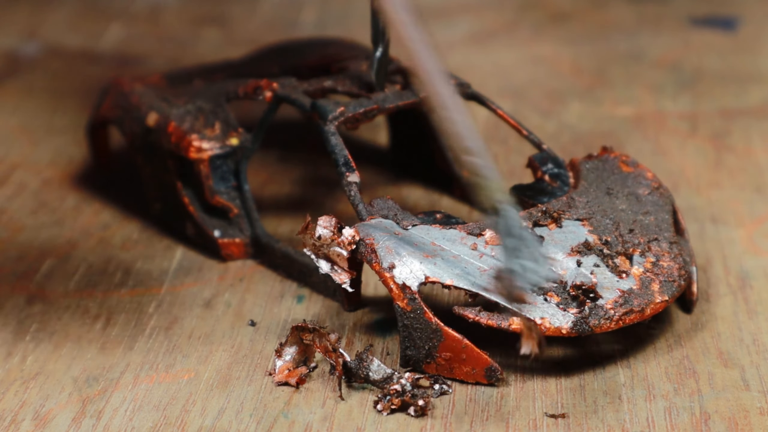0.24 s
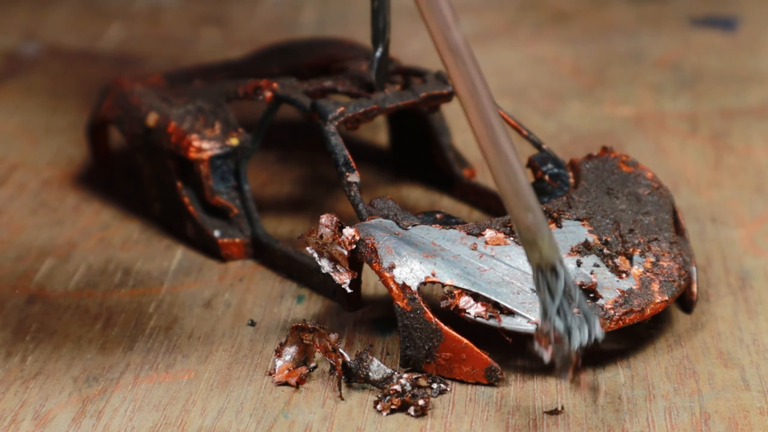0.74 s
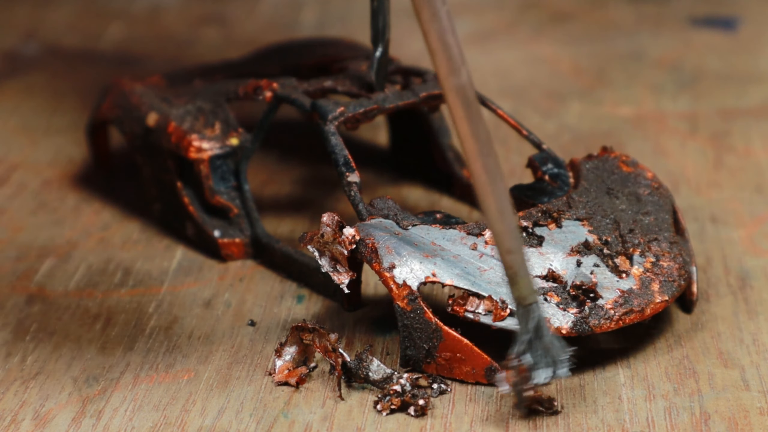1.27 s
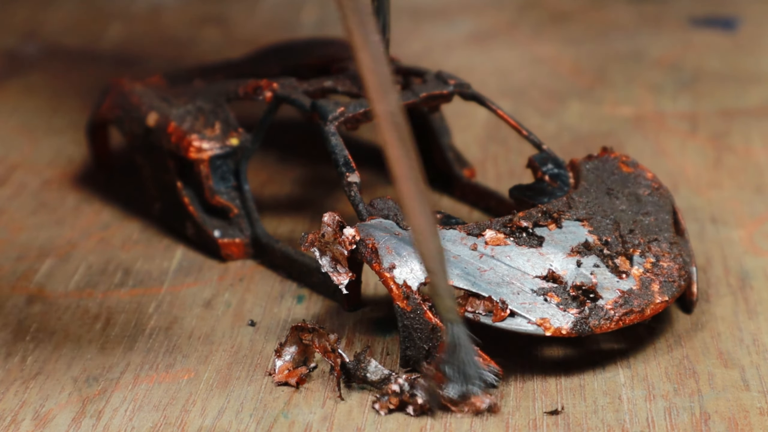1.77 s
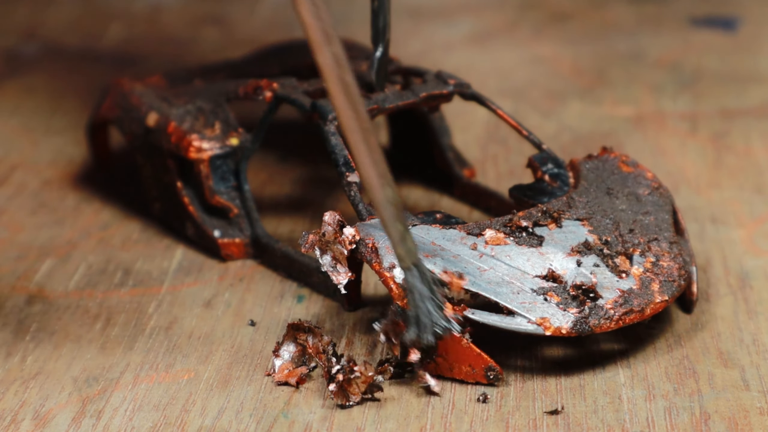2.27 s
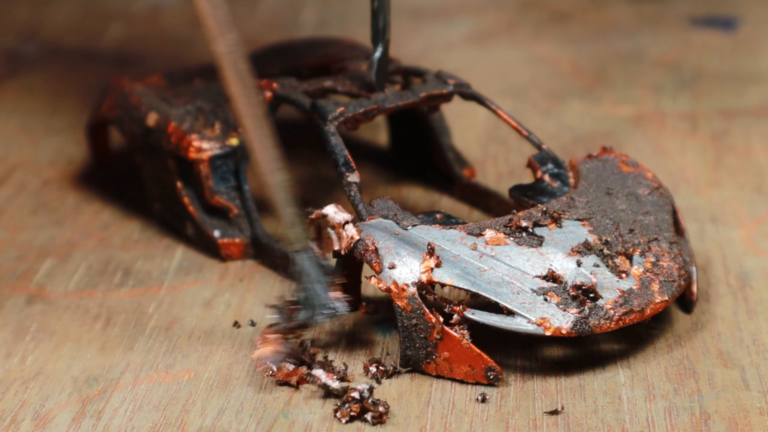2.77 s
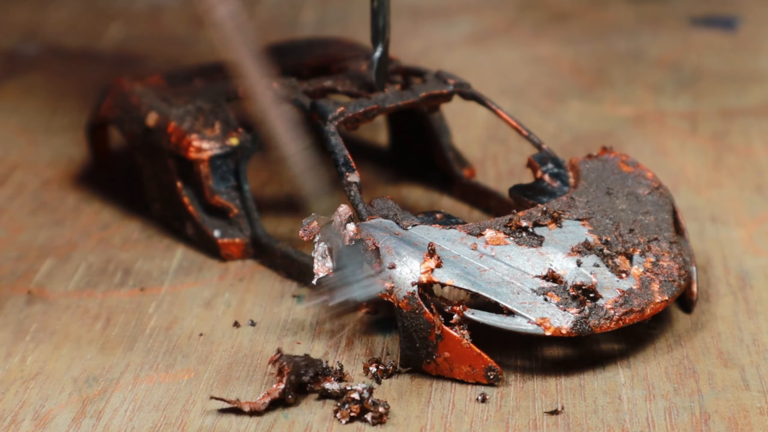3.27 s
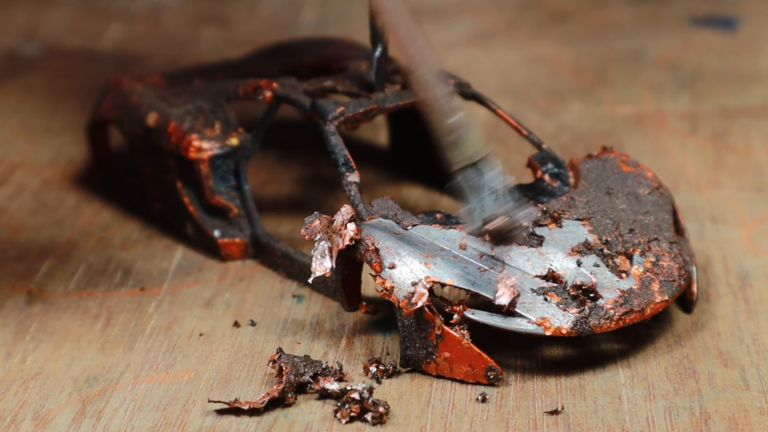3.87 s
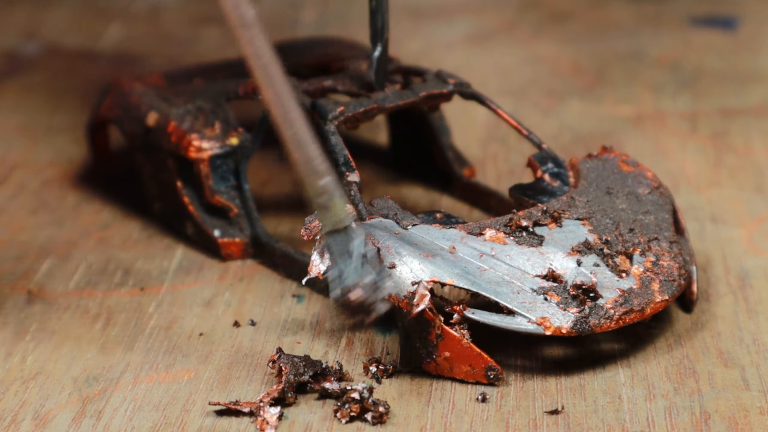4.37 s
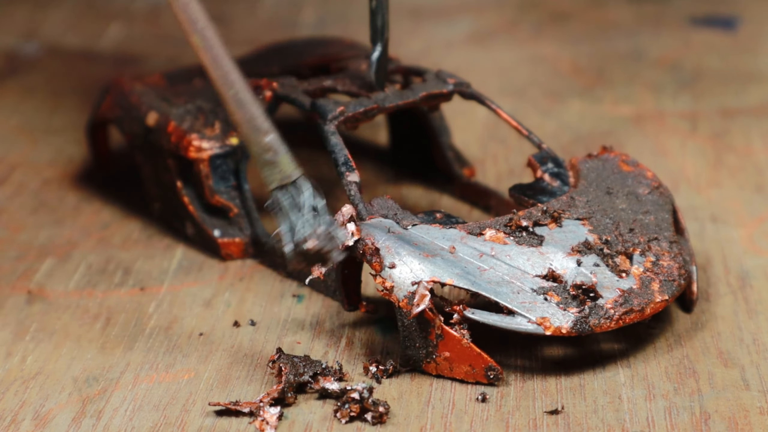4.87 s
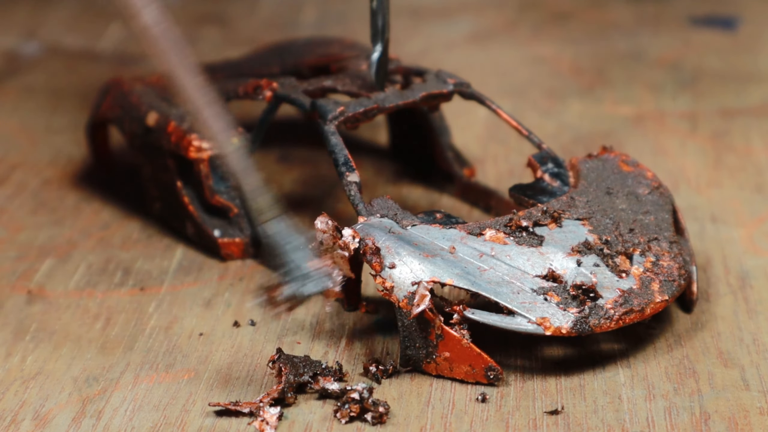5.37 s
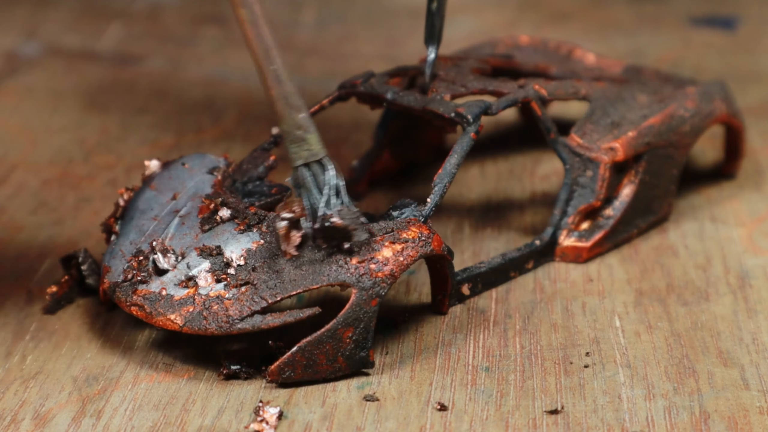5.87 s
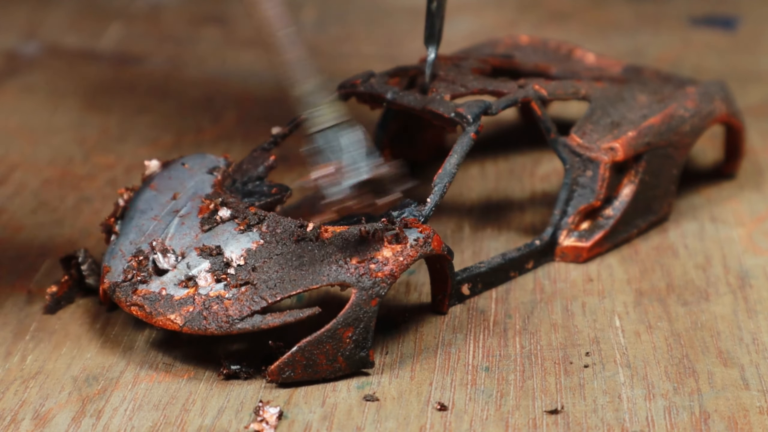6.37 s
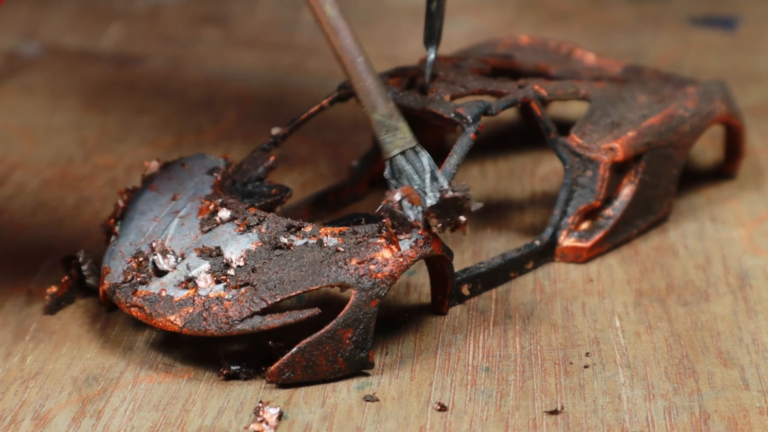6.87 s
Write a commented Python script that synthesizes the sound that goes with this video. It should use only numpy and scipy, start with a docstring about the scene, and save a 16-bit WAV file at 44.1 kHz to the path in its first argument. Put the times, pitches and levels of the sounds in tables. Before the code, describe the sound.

Close and nearly mono: bristles scratch a thin metal shell in separate strokes, first on the bonnet, then the door with crisp snaps and small knocks, bonnet again, then briefly the door. A momentary dropout at about 5.9 seconds leads to lighter, regular scrubs on the far wing, with wider stereo and a little more room. Low bench rumble and soft air noise lie beneath.

```python
"""A stiff little brush scrubs loosened paint off a die-cast toy car body pinned to a wooden bench: its bristles
stick and slip in dense grains, noise pulses that excite resonators for the modes of shell and bench.
Strokes land with soft low knocks, tufts snap over edges in bright noise bursts with pings, and paint crumbs tick.
After catches a decaying sine rings on; a rumble, a short room tail and faint air noise lie beneath.
The brush works on bonnet, door, bonnet and door; after a brief silence, on the far wing with a wider sound."""
import sys
import numpy as np
from scipy import signal
from scipy.fft import rfft, irfft
from scipy.io import wavfile

SR = 44100
rng = np.random.default_rng(int(sys.argv[2]) if len(sys.argv) > 2 else 0)


def materialize(psi):
    """Save the field psi as 16-bit PCM at rate SR to the path in sys.argv[1].

    A 1-D psi becomes a single channel; in a 2-D psi each row is a channel.
    """
    bounded = np.clip(np.atleast_2d(psi).T, -1, 1)
    quanta = np.round(bounded * 32767).astype(np.int16)
    wavfile.write(sys.argv[1], SR, quanta)


N = 314874
TIME = np.arange(N) / SR   # s

# All table levels are relative.
# spectrum of the room noise: f/Hz, density/dB
AIR_SPECTRUM = [(25, -9.5), (70, -1.5), (250, -6.5), (400, -10.5), (1000, -17.5), (3000, -22),
                (12000, -25.5), (16000, -20.5)]
# shudder of the bench as the hand bears down: t/s, level/dB, time to fall 30 dB/s
SHUDDERS = [(3.66, -50, 0.7), (6.63, -48.5, 0.34)]
# crumbs of paint breaking off: t/s, peak level/dB
CRUMB_TICKS = [(1.132, -45), (3.348, -52), (3.359, -48.5), (3.432, -51.5), (3.832, -55.5), (4.207, -49.5),
               (4.269, -49), (6.097, -54.5)]
# spectrum of a crumb's tick: f/Hz, density/dB
CRUMB_SPECTRUM = [(300, 3), (1000, 0), (2200, 2.5), (4500, -3.5), (10000, -3), (15000, -7)]
# resonances of shell and bench: f/Hz, width/Hz, level on the door/dB, on the bonnet/dB, on the far wing/dB
SHELL_MODES = [(133, 66, -11.5, -6.5, -5.5), (204.4, 28.5, -6.5, -7, -11.5), (256.2, 9.6, -15, -8, -11.5),
               (327.5, 13.5, -17.5, -35, -16.5), (381, 26, -14.5, -18.5, -19.5),
               (518.5, 24.5, -11, -10.5, -20.5), (667, 37, -20.5, -22.5, -17),
               (818, 26.6, -11.5, -11.5, -12), (945, 74, -28, -15, -12.5), (1194, 40, -8, -16.5, -36),
               (1254, 64, -11.5, -20.5, -10), (1301, 27, -15, -10.5, -36), (1430, 88, -37, -12.5, -4.5),
               (1571, 70, -17, -11, -15.5), (1640, 72, -16.5, -9, -35), (2110, 91, -20.5, -52, -43),
               (2282, 73, -23, -23, -10), (2426, 100, -14, -17, -7.5), (2820, 82, -15, -18, -14.5),
               (3174, 320, -18, -16, -5), (3795, 260, -17, -15, -9.5), (4520, 410, -11.5, -15, -18),
               (5815, 280, -10, -28, -12.5), (6126, 170, -8, -5, -8), (7900, 120, -41, -38, -24),
               (8060, 940, -13, -19, -37), (9460, 2000, -12.5, -7.5, -8), (10740, 900, -16, -13.5, -11),
               (12650, 3600, -32, -5, -38)]
# landings of the brush: t/s, thud of the bench level/dB, clack of the shell level/dB
LANDINGS = [(.049, -31.5, -53), (.446, -31, -63), (.903, -26.5, -61), (.942, -26.5, -35), (1.256, -41, -36),
            (1.436, -50, -37), (1.861, -31, -25.5), (2.258, -30.5, -47), (2.716, -35.5, -39.5),
            (4.024, -49.5, -54), (4.325, -39.5, -62), (5.185, -37.5, -39)]
# tufts snapping over an edge: t/s, crack level/dB, shell ping level/dB, shell clack level/dB,
# time to fall 30 dB/s
TUFT_SNAPS = [(.047, -40, -54, -46, 0.011), (0.067, -26.5, -66, -28, 0.02),
              (0.442, -46, -48.5, -44.5, 0.02), (0.489, -38, -44.5, -66, 0.022),
              (0.561, -26, -36, -38, .007), (0.703, -37, -52, -60, .006), (0.642, -26.5, -55, -34, 0.02),
              (0.7162, -18.5, -57, -58, 0.0064), (0.898, -34, -37.5, -41.5, 0.018),
              (0.94, -14, -21, -25.5, 0.015), (0.9937, -15, -34, -60, 0.011),
              (1.0108, -17, -37, -26, 0.0087), (1.084, -27, -45, -60, 0.0096),
              (1.095, -24, -46, -65, 0.011), (1.184, -35.5, -65, -59, 0.036),
              (1.2072, -18.5, -33, -38, 0.01), (1.264, -14, -40, -39, 0.013),
              (1.493, -22, -46, -35, 0.0059), (1.701, -21, -69.5, -36.5, 0.011),
              (1.895, -21, -35, -34.5, 0.0063), (1.902, -25, -48, -52, .008),
              (2.2513, -19.5, -35.5, -44, 0.023), (2.3253, -13.5, -35, -27, 0.022),
              (2.461, -26, -45, -45, 0.0084), (2.84, -25, -39, -30, 0.012), (3.2182, -23, -40, -26, 0.0036),
              (3.2852, -33, -45, -47, .012), (3.2928, -30.5, -44, -60, .014),
              (3.679, -21.5, -46, -44, 0.0076), (4.077, -37, -53, -34, 0.011),
              (4.326, -42.5, -53, -55.5, 0.049), (4.361, -40, -34.5, -48, 0.05),
              (4.833, -27, -58, -58, 0.0069), (5.191, -28, -47, -31, .018), (5.299, -21, -46, -43, 0.013),
              (6.353, -44, -44, -44.5, 0.006), (6.777, -56, -47, -34.5, 0.019)]
# spectrum of a snap's crack: f/Hz, density/dB
CRACK_SPECTRUM = [(500, -8.5), (2000, -3.5), (5000, -10), (8000, 4), (11000, 5), (13500, 4), (16000, -2)]
# the brush catches on an edge, loads up and slips off: t/s, time to load by 30 dB/s,
# rasp level/dB, push level/dB, level of the ring left behind/dB
EDGE_CATCHES = [(.071, 0.0059, -31, -32.5, -40.5), (.553, 0.055, -34, -33, -68),
                (0.715, .03, -58, -54, -55), (1.264, 0.034, -37, -30.5, -47.5),
                (1.896, 0.02, -31.5, -34, -57), (1.986, 0.1, -44, -36.5, -46),
                (2.085, 0.055, -42.5, -51, -48.5), (2.328, 0.014, -29, -41, -57),
                (2.381, .06, -47, -31.5, -48), (2.469, 0.049, -30.5, -31.5, -42),
                (2.843, 0.033, -33, -46, -50.5), (3.215, 0.026, -33, -53, -37),
                (5.297, 0.055, -32.5, -37, -67)]
# place of the brush: from t/s, place (0 door, 1 bonnet, 2 far wing)
BRUSH_PLACES = [(0, 1), (.3, 0), (3.5, 1), (5.5, 0), (5.88, 2)]
# fading by 30 dB as the brush lifts, one row per place: rasp time/s, push time/s
LIFT_TIMES = [(0.027, 0.048), (0.019, 0.025), (0.053, 0.043)]
# strokes: t when the bristles are fully down/s, attack/s, hold/s, bristle rasp level/dB,
# push on the shell level/dB, swell over the hold/dB, swish of the tips level/dB,
# rub on the panel edge level/dB, weight on the low modes level/dB
BRUSH_STROKES = [(0.073, .008, 0.084, -46.5, -46, 0, -18, -18, -2),
                 (0.522, .075, 0.17, -46.5, -44, 1, -2, -4.5, -1.5),
                 (0.944, 0.041, 0.14, -49, -46, 2.5, 1.5, -7.5, -5),
                 (1.251, 0.08, 0.036, -54.5, -54, -1, -4, -14, -2.5),
                 (1.416, .012, .02, -49, -57.5, -2.5, 3, -1, -6),
                 (1.487, 0.056, 0.076, -44, -43.5, 2.5, -14, -10, -3.5),
                 (1.583, 0.021, 0.11, -57.5, -50, 4, -9, -16, -3.5),
                 (1.898, .04, 0.19, -50.5, -44.5, 2, -9.5, -22, -3),
                 (2.253, 0.0041, 0.013, -38.5, -42, -4, -9, -20, -3),
                 (2.311, 0.029, 0.15, -45.5, -44.5, -18.5, -9, -22, -4),
                 (2.735, 0.015, 0.087, -43, -41.5, 6.5, -13.5, -25, -3),
                 (3.166, 0.0086, 0.056, -44.5, -43.5, 1.5, -20, -28, -4),
                 (3.372, .06, 0.13, -66, -76, 1, -15, -15, -1),
                 (3.607, 0.036, .097, -42, -45, 2.5, -7, -15, -2),
                 (4.045, 0.038, 0.034, -43, -44.5, -0.5, -2.5, -18, -0.5),
                 (4.369, .012, 0.082, -45.5, -44.5, 2.5, -4, -17, 0),
                 (4.838, 0.053, 0.091, -46.5, -48, 0.5, -6, -15.5, -2),
                 (5.23, .045, 0.053, -41.5, -41.5, 6.5, -16, -17.5, -8.5),
                 (5.448, 0.091, .07, -63, -72.5, -1, -14, -14, 9.5),
                 (5.612, 0.0046, 0.019, -41.5, -43.5, -1, -11, -26, -4),
                 (5.692, 0.056, 0.085, -47, -47.5, -5.5, -10, -15, -5.5),
                 (5.954, 0.028, 0.014, -50.5, -54, 4, -13, -18, 0.5),
                 (6.015, 0.02, 0.0089, -50.5, -54, -12, -1, -29, 3.5),
                 (6.182, 0.039, 0.033, -46.5, -44, -2, -8, -17, -3.5),
                 (6.385, 0.062, 0.022, -45.5, -46.5, 5, -6, -24, 0),
                 (6.584, 0.066, .045, -47.5, -45.5, -3, -13, -13, -2.5),
                 (6.774, .02, 0.073, -47.5, -47.5, -1.5, -9, -15, -3.5),
                 (7.019, 0.047, 0.049, -45, -44, -1, -16, -16, -4)]
# spectrum of the fine swish of the bristles: f/Hz, density/dB
SWISH_SPECTRUM = [(300, -22), (1000, -22), (2500, 5.5), (5000, -21.5), (9000, 6.5), (12500, 8.5),
                  (14500, 11), (16000, -30)]

AIR_DB = -62.5   # rms of each air noise before its weight in mid or side
SHUDDER_RISE_S, LANDING_FALL_S, CATCH_FALL_S = 0.057, 0.014, 0.021   # times for 30 dB
BENCH_TOP_HZ, LOW_TOP_HZ, SHELL_TOP_HZ = 300, 900, 2000   # bounds between the forces driving the modes
RING_HZ, RING_T60_S = 1309, .28
EDGE_HZ, EDGE_WIDTH_HZ = 3215, 74   # lower mode of the panel edge
TING_HZ, TING_WIDTH_HZ, TING_DB = 7900, 260, -13.5   # its upper mode
UNEVEN_DB, UNEVEN_PER_S = 1.92, 55   # wobble of the pressure as the bristles ride over the crust
SILENT_FROM_S, SILENT_TO_S = 5.867, 5.894
SIDE_FROM_HZ, CUTOFF_HZ = 1000, 16200


def from_db(db):
    """A level in decibels is twenty times the logarithm of an amplitude ratio; returns the ratio."""
    return 10 ** (np.asarray(db) / 20)


def rms_one(x):
    """Division by the root mean square normalises the power to 1."""
    return x / np.sqrt(np.mean(x ** 2) + 1e-20)


def random_signs():
    """Random polarity whitens a train of pulses."""
    return rng.choice([-1, 1], N)


def drift(rate):
    """Interpolated random values, `rate` a second, form a slow fluctuation of rms 1."""
    knots = rng.standard_normal(int(rate * N / SR) + 2)
    return rms_one(np.interp(TIME * rate, np.arange(len(knots)), knots))


def low_pass(x, hz, order=2):
    """A Butterworth filter attenuates frequencies above its corner."""
    sections = signal.butter(order, min(hz, SR / 2 - 1), fs=SR, output="sos")
    return signal.sosfilt(sections, x + 1e-18)


def resonate(x, hz, width):
    """A pole pair forms a damped mode, scaled to keep the power of white noise."""
    r = np.exp(-np.pi * width / SR)
    zeros = np.sqrt((1 - r * r) / 2) * np.array([1, 0, -1])
    poles = [1, -2 * r * np.cos(2 * np.pi * hz / SR), r * r]
    return signal.lfilter(zeros, poles, x + 1e-18)


def colour(x, spectrum, size=4096):
    """A causal minimum-phase filter imposes a spectrum and keeps the power of white noise."""
    hz, db = np.transpose(spectrum)
    bins_hz = np.arange(size // 2 + 1) * SR / size
    gain = rms_one(from_db(np.interp(np.log(bins_hz + 1), np.log(hz), db)))
    # folding the cepstrum onto positive times gives minimum phase
    cepstrum = irfft(np.log(gain))
    cepstrum[1:size // 2] *= 2
    cepstrum[size // 2 + 1:] = 0
    return signal.fftconvolve(x, irfft(np.exp(rfft(cepstrum))))[:N]


def bursts(times, levels_db, lengths):
    """Sudden releases decay exponentially, each by 30 dB over its length."""
    out = np.zeros(N)
    for s, db, length in zip(times, levels_db, lengths):
        at = int(s * SR)
        age = TIME[:min(int(2 * length * SR), N - at)]
        out[at:at + len(age)] += from_db(db - 30 * age / length)
    return out


def swell(s, rise_s, hold_s, fall_s, tilt_db=0):
    """A contact force climbs 30 dB over its rise up to s, holds with a tilt, and drops 30 dB over its fall."""
    out = np.zeros(N)
    start = max(int((s - 2 * rise_s) * SR), 0)
    span = slice(start, int((s + hold_s + 2 * fall_s) * SR))
    age = TIME[span] - s
    outside = np.maximum(-age / rise_s, 0) + np.maximum((age - hold_s) / fall_s, 0)
    tilt = tilt_db * np.interp(age, [0, hold_s], [-.5, .5])
    out[span] = from_db(tilt - 30 * outside)
    return out


def held(rows):
    """A stepwise quantity keeps each row's values until the next row starts."""
    starts, *columns = np.transpose(rows)
    row = np.maximum(np.searchsorted(starts, TIME, side="right") - 1, 0)
    return [column[row] for column in columns]


def brush_place():
    """The point of contact selects which modal strengths apply at every sample."""
    return held(BRUSH_PLACES)[0].astype(int)


def air_noise():
    """Stationary room noise is white noise with a shaped spectrum."""
    return from_db(AIR_DB) * colour(rng.standard_normal(N), AIR_SPECTRUM)


def room(x, t60, wall_hz):
    """Reverberation convolves sound with exponentially decaying noise, here a short, dull workshop tail."""
    age = TIME[:SR // 2]
    decay = from_db(-60 * age / t60) * (age > .004)   # starts after 4 ms
    tail = low_pass(rng.standard_normal(len(age)) * decay, wall_hz, order=1)
    return signal.fftconvolve(x, tail / np.sqrt(np.sum(tail ** 2)))[:N]


def shudder(push, hz, width, top_hz, stroke_db):
    """Forced vibration: noise scaled by load makes the bench top rumble under strokes and the bearing hand."""
    load = from_db(stroke_db) * push
    for s, db, fall_s in SHUDDERS:
        load = load + from_db(db) * swell(s, SHUDDER_RISE_S, 0, fall_s)
    return low_pass(resonate(load * rng.standard_normal(N), hz, width), top_hz)


def crumbs(length_s):
    """A small, dry impact has a broad spectrum and dies at once: one tick for each crumb."""
    s, db = np.transpose(CRUMB_TICKS)
    ticks = bursts(s, db, np.full(len(s), length_s))
    return colour(ticks * random_signs(), CRUMB_SPECTRUM)


def knocks(level_db, soft_hz, size=6):
    """A soft impact contains little treble, so a landing rocks only the lowest modes."""
    s, db, _ = np.transpose(LANDINGS)
    blows = np.zeros(N)
    blows[(s * SR).astype(int)] = from_db(db + level_db)
    blows = low_pass(blows, soft_hz)
    out = np.zeros(N)
    for k, (hz, width, door_db, _, _) in enumerate(SHELL_MODES[:size]):
        out += (-1) ** k * from_db(door_db) * resonate(blows, hz, width)   # alternating polarity
    return out


def free_ring():
    """Free vibration: let go by the brush, the shell sings on as an exponentially decaying sine."""
    out = np.zeros(N)
    age = TIME[:SR // 2]
    for s, *_, db in EDGE_CATCHES:
        at = int(s * SR)
        decay = from_db(db - 60 * age / RING_T60_S)
        out[at:at + len(age)] += decay * np.sin(2 * np.pi * RING_HZ * age)
    return out


def panel_edge(x):
    """Modal superposition: the thin edge of a panel rings in two high modes."""
    ting = from_db(TING_DB) * resonate(x, TING_HZ, TING_WIDTH_HZ)
    return resonate(x, EDGE_HZ, EDGE_WIDTH_HZ) + ting


def snaps(crack_db, first_db, first_s, ping_db):
    """Sudden elastic release: a tuft lets go, a short and a longer burst crack, and the panel edge pings."""
    s, cracks, pings, _, lengths = np.transpose(TUFT_SNAPS)
    first = bursts(s, cracks + first_db, np.full(len(s), first_s))
    letting_go = first + bursts(s, cracks + crack_db, lengths)
    crack = colour(letting_go * random_signs(), CRACK_SPECTRUM)
    ping = panel_edge(bursts(s, pings + ping_db, lengths) * random_signs())
    return crack + ping


def slips(per_s, spread_db, clump_db, clump_rate):
    """Stick-slip friction releases bristles as random pulses, clumped as tufts let go; rms 1."""
    sizes = from_db(spread_db * np.minimum(rng.exponential(1, N), 4))
    born = rng.random(N) < per_s / SR
    clumps = from_db(clump_db * np.clip(drift(clump_rate), -2, 2))
    return rms_one(sizes * born * clumps)


def flicks(per_s, low_hz, high_hz, width, count=10):
    """Freed bristles vibrate briefly, each dealt one of `count` geometrically spaced pitches; rms 1."""
    sizes = from_db(3 * np.minimum(rng.exponential(1, N), 3)) * random_signs()
    born = rng.random(N) < per_s / SR
    dealt = rng.integers(0, count, N)
    pitches = np.geomspace(low_hz, high_hz, count)
    return rms_one(sum(resonate(sizes * born * (dealt == k), hz, width) for k, hz in enumerate(pitches)))


def shell(bench_force, shell_force, bristle_force, wander_db, wander_rate, low_db):
    """Modal excitation: each mode's strength depends on the place; treble modes fluctuate as contact travels."""
    place = brush_place()
    weight = from_db(low_db)
    out = np.zeros(N)
    for hz, width, *place_db in SHELL_MODES:
        if hz < SHELL_TOP_HZ:
            force = bench_force if hz < BENCH_TOP_HZ else shell_force
            force = force * (weight if hz < LOW_TOP_HZ else 1)
        else:
            force = bristle_force * from_db(wander_db * drift(wander_rate))
        out += resonate(force * from_db(place_db)[place] * random_signs(), hz, width)
    return out


def effort():
    """Contact force governs friction: strokes and catches set the bristles' rasp and their push on the shell."""
    place = brush_place()
    rasp, push = np.zeros((2, N))
    for s, attack_s, hold_s, rasp_db, push_db, swell_db, *_ in BRUSH_STROKES:
        rasp_lift_s, push_lift_s = LIFT_TIMES[place[int(s * SR)]]
        rasp += from_db(rasp_db) * swell(s, attack_s, hold_s, rasp_lift_s, swell_db)
        push += from_db(push_db) * swell(s, attack_s, hold_s, push_lift_s, swell_db)
    wobble = from_db(UNEVEN_DB * drift(UNEVEN_PER_S))
    rasp, push = rasp * wobble, push * wobble
    for s, loading_s, rasp_db, push_db, _ in EDGE_CATCHES:
        load = swell(s, loading_s, 0, CATCH_FALL_S)
        rasp = np.maximum(rasp, from_db(rasp_db) * load)
        push = np.maximum(push, from_db(push_db) * load)
    return rasp, push


def brushing(rasp, push, bench_db, push_db, rasp_db, clack_db, knock_db, edge_db, flick_db, clump_db):
    """Stick-slip excitation: bristles ring the shell, hiss and flick; landings and snaps kick the same modes."""
    tip_rows = [(s - attack_s, swish, rub, low) for s, attack_s, *_, swish, rub, low in BRUSH_STROKES]
    swish_db, rub_db, low_db = held(tip_rows)
    grains = slips(per_s=9000, spread_db=2.0, clump_db=clump_db, clump_rate=450)
    tips = slips(per_s=3200, spread_db=8.5, clump_db=clump_db, clump_rate=190)   # finest tips slip alone

    landing_s, _, landing_db = np.transpose(LANDINGS)
    landings = bursts(landing_s, landing_db + knock_db, np.full(len(LANDINGS), LANDING_FALL_S))
    s, _, pings, clacks, lengths = np.transpose(TUFT_SNAPS)
    kicks = bursts(s, clacks + clack_db, lengths)
    edge_kicks = bursts(s, pings + edge_db, lengths)

    force = (push * from_db(push_db) + landings) * grains
    bristle_force = rasp * grains * from_db(rasp_db) + edge_kicks
    body = shell(force * from_db(bench_db), force + kicks, bristle_force,
                 wander_db=2.0, wander_rate=70, low_db=low_db)
    edge = panel_edge(rasp * grains * from_db(rub_db) * random_signs())
    swish = colour(rasp * tips * from_db(swish_db) * random_signs(), SWISH_SPECTRUM)
    flicking = flicks(per_s=450, low_hz=7000, high_hz=14900, width=390)
    return body + edge + swish + rasp * from_db(flick_db) * flicking


def scene():
    """Superposition in mid and side: almost mono at first; after the brief silence, more room and width."""
    rasp, push = effort()
    work = brushing(rasp, push, bench_db=-2.0, push_db=1.0, rasp_db=-4.0, clack_db=0.5, knock_db=1.5,
                    edge_db=-5.5, flick_db=-14.0, clump_db=3.5)
    work = work + snaps(crack_db=-13.0, first_db=-12.0, first_s=0.0026, ping_db=-4.5)
    work = work + crumbs(length_s=0.014)
    work = work + knocks(level_db=25.0, soft_hz=302) + free_ring()

    wide = TIME > SILENT_FROM_S
    mid = work + from_db(-21.0) * room(work, t60=0.16, wall_hz=6060)
    mid = mid + shudder(push, hz=66.0, width=35, top_hz=135, stroke_db=-17.5)
    mid = mid + air_noise() * np.where(wide, from_db(-5.0), 1)

    reflections = from_db(-16) * room(work * wide, t60=.04, wall_hz=7000)
    side = reflections + air_noise() * np.where(wide, from_db(-7.0), from_db(-23.0))
    # long waves reach both channels alike
    side = signal.sosfilt(signal.butter(2, SIDE_FROM_HZ, "high", fs=SR, output="sos"), side)
    return np.array([mid + side, mid - side])


def record(dry):
    """Band limitation: the top rolls off, the sound drops out briefly, and the highest treble is cut."""
    sounding = (TIME < SILENT_FROM_S) | (TIME > SILENT_TO_S)
    sound = low_pass(dry, 13300, order=4) * sounding
    return signal.sosfilt(signal.ellip(10, .2, 80, CUTOFF_HZ, fs=SR, output="sos"), sound)


dry = scene()
out = record(dry)
materialize(out)
```